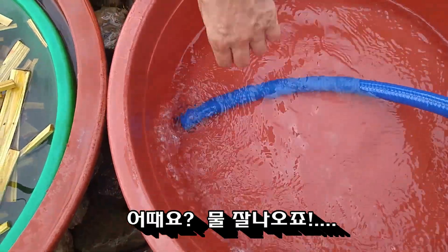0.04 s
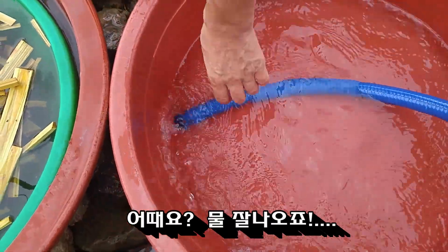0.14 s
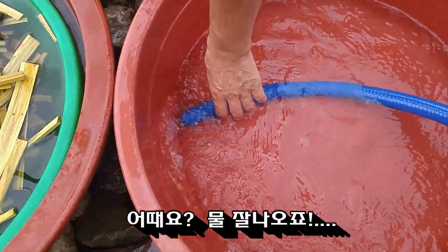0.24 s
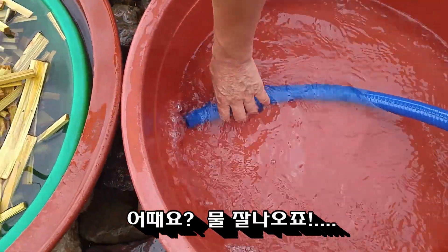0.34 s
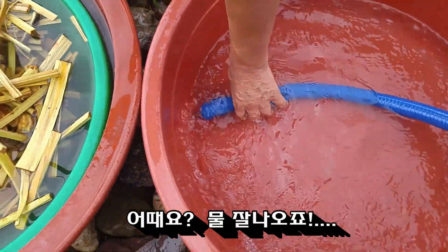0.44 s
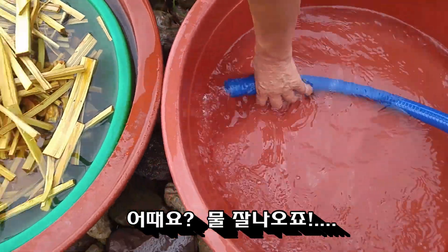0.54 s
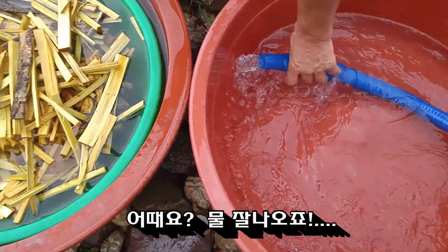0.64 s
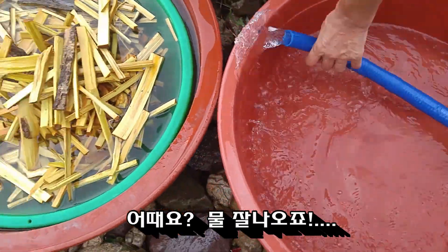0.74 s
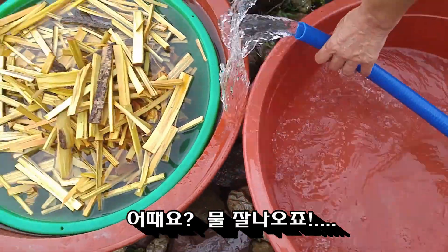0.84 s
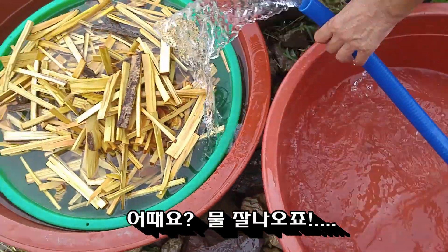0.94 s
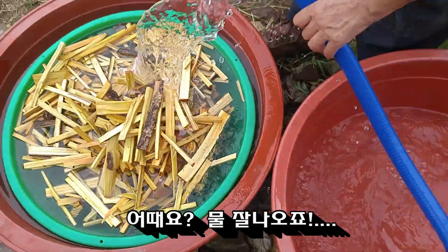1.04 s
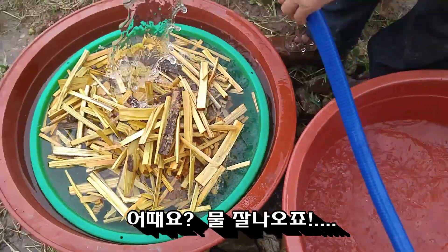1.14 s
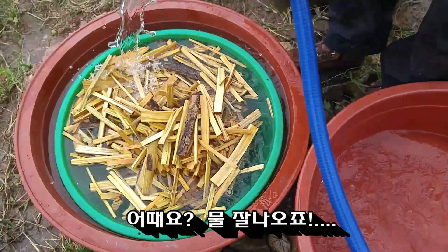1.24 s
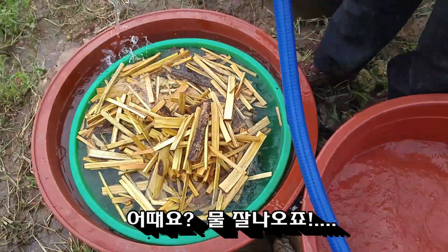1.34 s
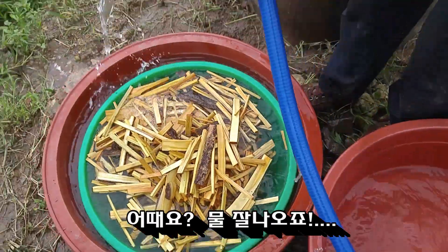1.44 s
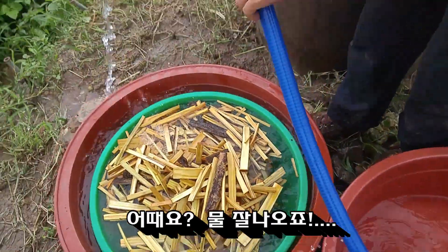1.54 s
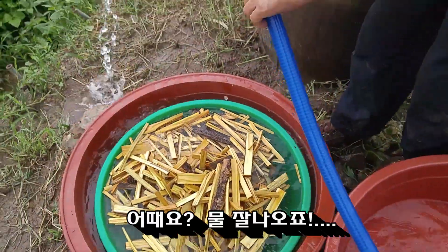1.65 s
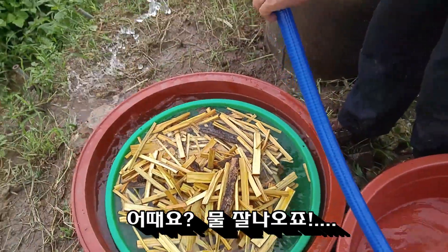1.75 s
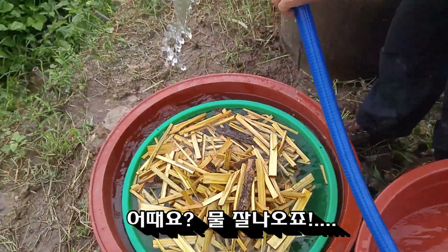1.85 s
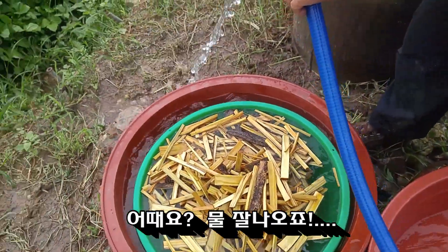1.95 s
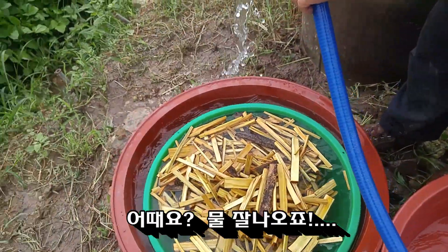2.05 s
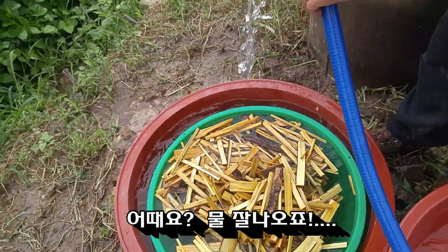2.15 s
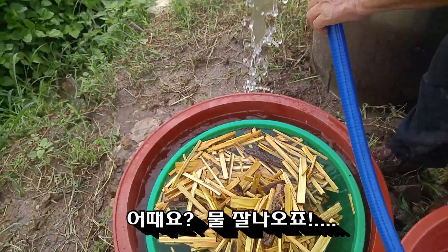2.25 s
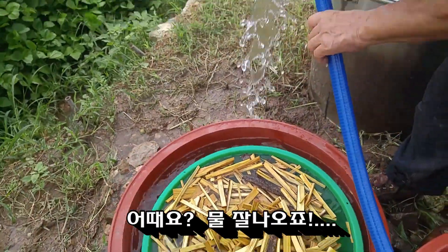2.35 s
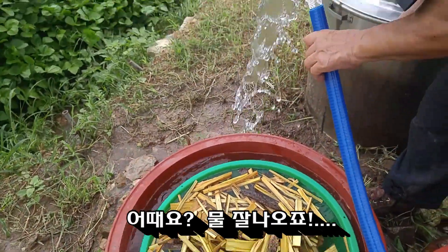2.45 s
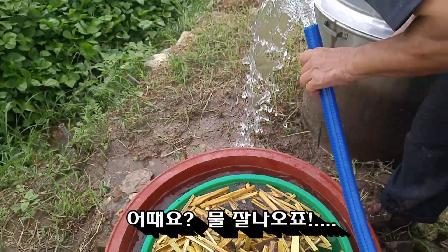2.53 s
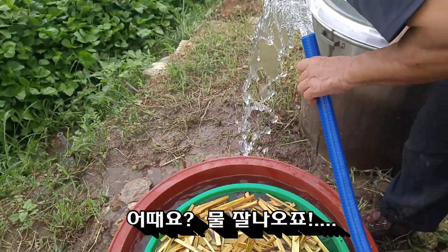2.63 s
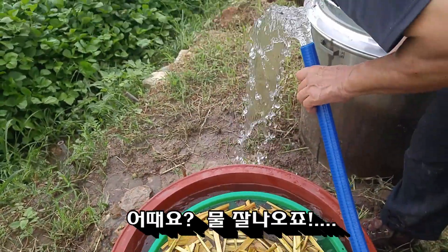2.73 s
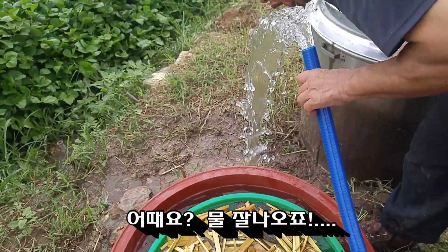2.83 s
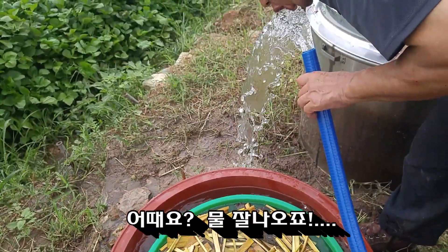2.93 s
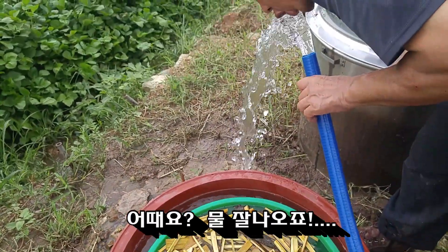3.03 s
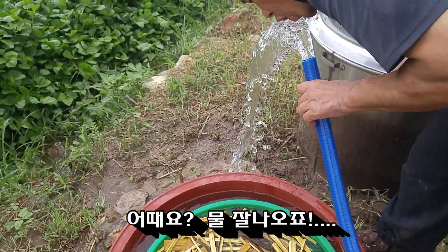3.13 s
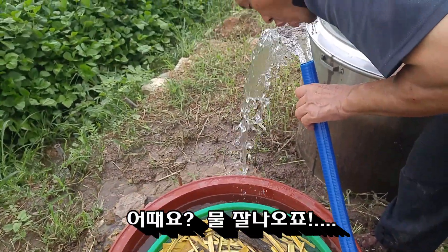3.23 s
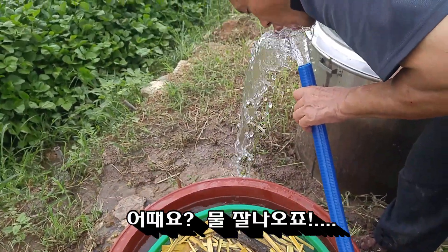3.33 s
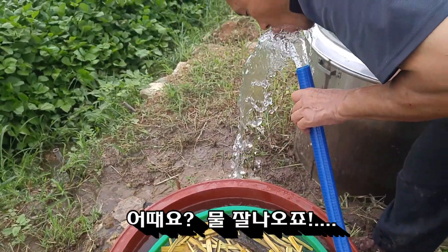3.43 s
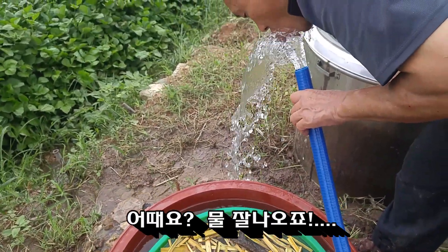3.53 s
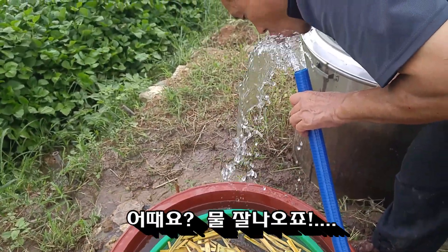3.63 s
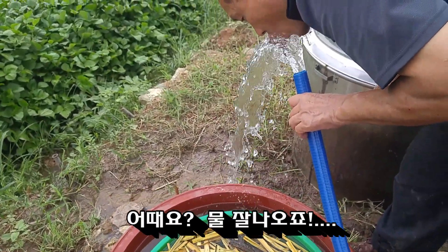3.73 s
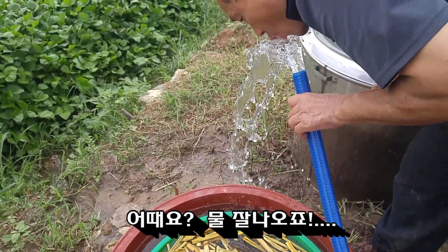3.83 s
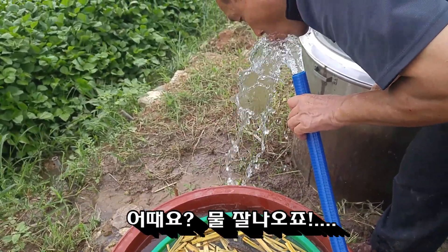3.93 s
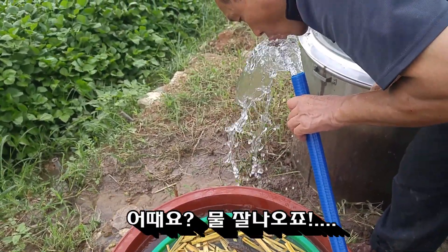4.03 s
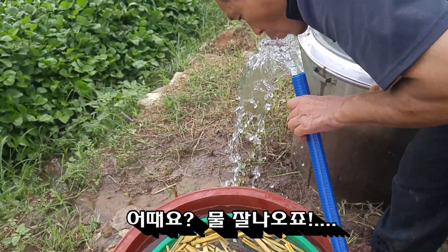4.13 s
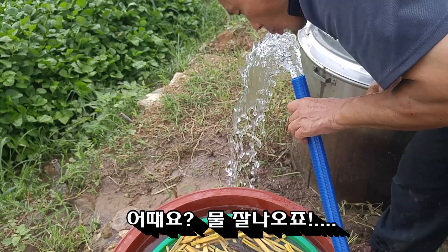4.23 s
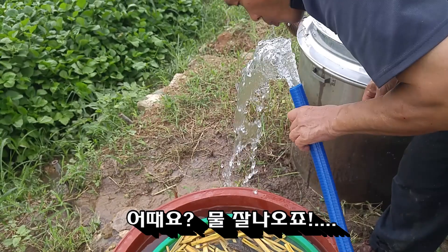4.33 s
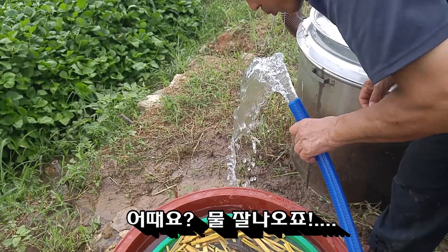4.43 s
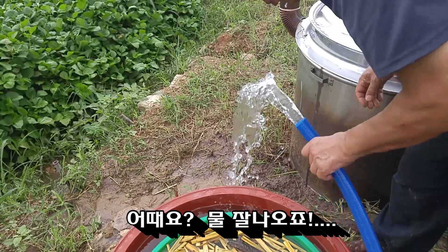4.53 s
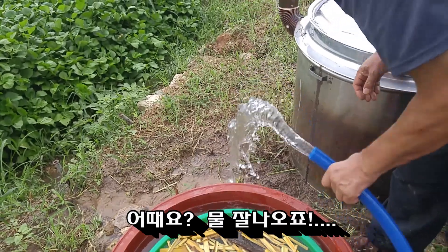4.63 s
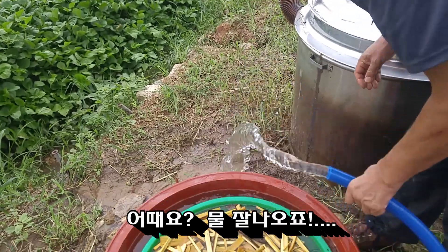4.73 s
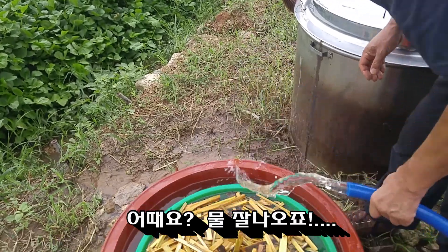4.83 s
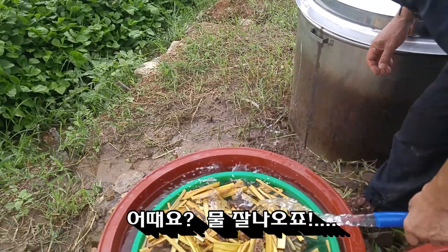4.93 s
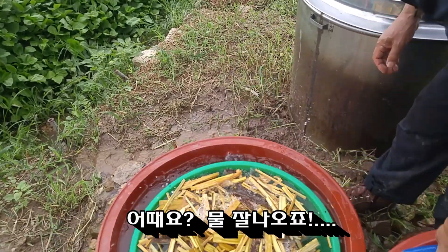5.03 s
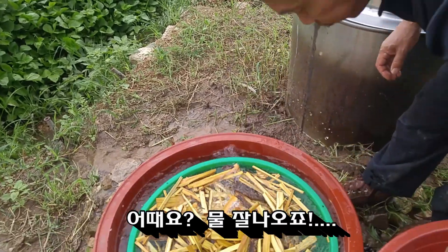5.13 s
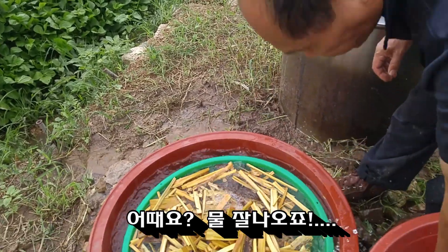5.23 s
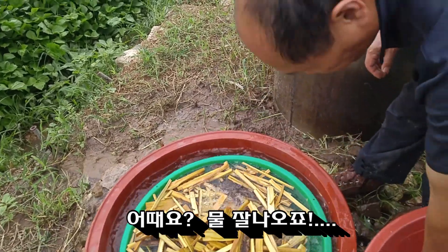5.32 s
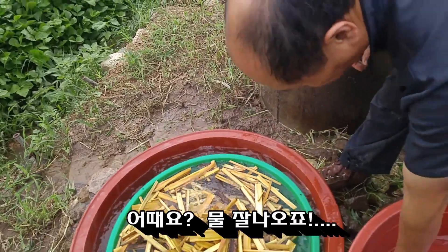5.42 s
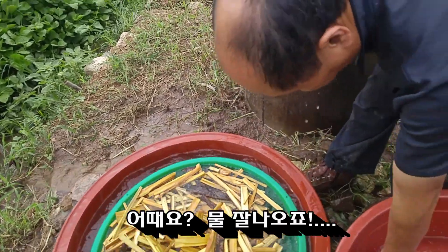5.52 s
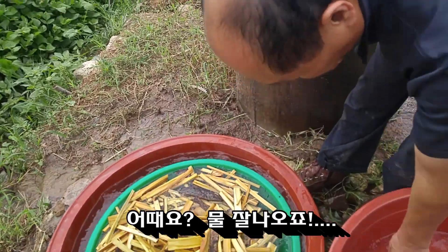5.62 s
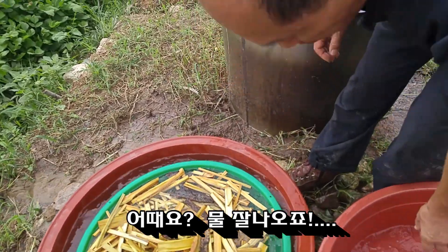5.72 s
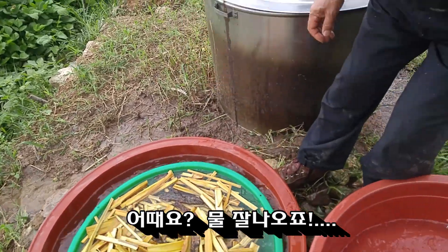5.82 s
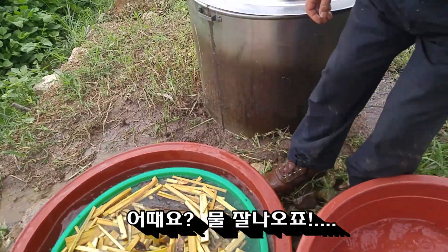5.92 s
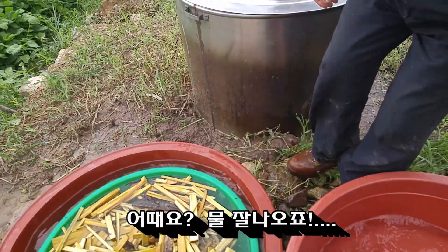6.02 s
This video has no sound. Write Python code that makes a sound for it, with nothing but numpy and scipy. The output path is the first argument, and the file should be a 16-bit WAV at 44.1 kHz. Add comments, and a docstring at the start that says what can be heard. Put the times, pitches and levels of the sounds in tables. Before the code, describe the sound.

Water from a hose gurgles and bubbles in a plastic basin outdoors. The stream lifts out, sweeps across a second tub and splatters onto wet ground, growing into a bright hiss full of sharp drops and small plops. Near the end it splashes back into the tubs with a few hollow plastic knocks. Light wind rumbles now and then on the close microphone, mostly on the right.

```python
"""Water hisses, spatters and gurgles as a hose stream sweeps from a plastic basin over a second tub and
wet ground, then back. Drop impacts make the spray and splats; trapped air rings as bubbles, plops and
gulps. Water and bumps ring the tub walls. Wind rumbles, mostly on the right microphone port. The
microphone adds a faint steady hiss, and its cavity a treble peak."""
import sys
import numpy as np
from scipy import signal
from scipy.io import wavfile

SR = 44100
rng = np.random.default_rng(int(sys.argv[2]) if len(sys.argv) > 2 else 0)


def digitize_waveform(pressure):
    """Quantize a signal to 16-bit integers and store it at the path in sys.argv[1].

    Rows of a 2-D input are taken as channels; values are limited to [-1, 1].
    """
    field = np.atleast_2d(pressure).T
    bounded = np.clip(field, -1, 1)
    quanta = np.round(bounded * 32767).astype(np.int16)
    wavfile.write(sys.argv[1], SR, quanta)


N = 267687

# Water in tubs and puddles. Each row: time in seconds, gurgle level in dB, wall drumming level in dB.
POOL_LEVELS = [(0.0, -36, -43), (0.16, -41.5, -49.5), (0.505, -32, -40.5), (0.66, -47.5, -50),
               (0.71, -24, -47), (0.9, -35.5, -47), (1.03, -41.5, -40.5), (1.21, -31, -35.5),
               (1.445, -33, -64), (1.6, -50, -53), (1.7, -36, -52), (1.9, -44, -50.5), (2.27, -38, -52.5),
               (2.95, -40, -53), (3.0, -32.5, -58), (3.15, -40, -52), (3.83, -39.5, -44.5),
               (3.97, -30.5, -44), (4.25, -41, -57.5), (4.7, -39, -52.5), (4.78, -37, -45), (4.9, -36, -50),
               (5.18, -25.5, -44.5), (5.3, -31.5, -38), (5.43, -37.5, -42), (5.675, -40, -26),
               (5.78, -49.5, -48), (5.95, -41, -51), (6.0, -41, -38), (6.07, -37, -46)]


def amp(db):
    """dB to gain."""
    return 10 ** (np.asarray(db) / 20)


def rms_one(x):
    """Scale to unit rms."""
    return x / np.sqrt(np.mean(x ** 2) + 1e-20)


def peak_one(x):
    """Scale to unit peak."""
    return x / np.max(np.abs(x))


def bandpass(x, low_hz, high_hz, order=2):
    """Butterworth band-pass."""
    return signal.sosfilt(signal.butter(order, [low_hz, high_hz], "band", fs=SR, output="sos"), x)


def in_time(rows):
    """Interpolate (seconds, values..) rows to one curve per value column."""
    times_s, *columns = np.transpose(rows)
    return [np.interp(np.arange(N) / SR, times_s, column) for column in columns]


def drift(corner_hz):
    """Slow random wander, rms 1."""
    r = np.exp(-2 * np.pi * corner_hz * 20 / SR)   # runs at SR / 20
    slow = signal.lfilter([1], [1, -2 * r, r * r], rng.standard_normal(N // 20 + 2002))[2000:]
    return np.interp(np.arange(N) / 20, np.arange(len(slow)), rms_one(slow))


def ring(clicks, hz, t60_s):
    """Damped mode: a unit click starts a unit sine."""
    r, w = amp(-60 / (t60_s * SR)), 2 * np.pi * hz / SR
    return signal.lfilter([0, np.sin(w)], [1, -2 * r * np.cos(w), r * r], clicks + 1e-18)


def arrivals(per_s, spread_db):
    """Random clicks of uneven size."""
    sizes = amp(spread_db * np.minimum(rng.exponential(1, N), 3.0))
    return sizes * (rng.random(N) < per_s / SR)


def add(out, start_s, sound, pan_db):
    """Mix a sound in; positive pan is left."""
    at = round(start_s * SR)
    part = sound[..., :N - at]
    out[:, at:at + part.shape[-1]] += part * amp([[pan_db / 2], [-pan_db / 2]])


def stream_pan_db(time_s):
    """Side on which the stream lands."""
    # Each row: time in seconds, left over right in dB.
    sweep = [(0, 2), (0.75, -1), (0.97, -8), (1.3, 6.5), (2.05, 5), (2.25, -0.5), (5.0, 0.5), (5.35, -5.5),
             (6.07, -3)]
    return np.interp(time_s, *np.transpose(sweep))


def splashing(spectrum, per_s, spread_db, t60_s, rise_s, steady, patchy_db, coherence, colour_db,
              tilt_db=0):
    """Noise bands flare at each impact over a steady bed, highs dying sooner; stereo, rms 1."""
    points_hz, points_db = np.transpose(spectrum)
    edges_hz = points_hz[0] * 2 ** np.arange(0, np.log2(points_hz[-1] / points_hz[0]) + .3, .4)
    rise = np.exp(-1 / (rise_s * SR))
    impacts = arrivals(per_s, spread_db)
    white = rng.standard_normal((2, 3, N))
    out = 0
    for k, (low_hz, high_hz) in enumerate(zip(edges_hz, np.minimum(edges_hz[1:], .45 * SR))):
        hz = np.sqrt(low_hz * high_hz)
        shared, left, right = bandpass(white[k % 2], low_hz, high_hz)
        noise = np.sqrt(coherence) * shared + np.sqrt(1 - coherence) * np.array([left, right])
        band_t60_s = t60_s * (points_hz[0] / hz) ** 0.21
        fall = amp(-60 / (band_t60_s * SR))
        coloured = impacts * amp(colour_db * drift(71))   # each drop has its own colour
        flare = rms_one(signal.lfilter([1], np.convolve([1, -fall], [1, -rise]), coloured))
        level_db = np.interp(np.log(hz), np.log(points_hz), points_db)
        level_db = level_db + tilt_db * max(np.log2(8500 / hz), 0)
        out = out + amp(level_db + patchy_db * drift(10.5)) * (steady + flare) * noise
    return rms_one(out)


def spray():
    """Dense small drops merge into a hiss."""
    # Each row: frequency in Hz, relative density in dB.
    spectrum = [(900, -18), (1700, -9.5), (2200, -2), (3100, -1.5), (4500, 0.5), (5800, -0.4), (7200, 2.95),
                (9000, -0.5), (10500, 0.5), (12500, -1.5), (16000, -12)]
    # Each row: time in seconds, level in dB.
    levels = [(0, -40), (0.43, -41.5), (0.55, -37), (0.64, -44.5), (0.75, -34), (1.04, -37), (1.1, -38),
              (1.135, -26), (1.19, -34), (1.3, -32.5), (1.46, -25), (1.495, -38), (1.58, -47), (1.64, -38),
              (1.7, -26), (1.79, -30), (1.91, -21), (2.02, -27), (2.09, -23.5), (2.14, -31), (2.23, -26),
              (2.28, -34), (2.37, -26), (3.0, -26), (3.15, -28.5), (4.6, -28.5), (4.97, -26.5), (5.03, -18),
              (5.12, -30.5), (5.235, -20.5), (5.255, -33), (5.31, -40), (5.325, -29), (5.53, -36.5),
              (5.58, -29), (5.63, -39.5), (5.8, -43), (6.07, -47)]
    # Each row: time in seconds, boost in dB per octave below 8500 Hz.
    body = [(0, 1.5), (0.5, 1), (0.75, 3), (0.95, -2), (1.13, -3), (1.27, 3), (1.45, -2), (1.6, 0),
            (1.9, -3.5), (2.1, 0), (3.9, -0.5), (4.9, 0.3), (5.12, 2.5), (5.26, -0.5), (5.55, -2.5),
            (6.07, -2)]
    level_db, = in_time(levels)
    tilt_db, = in_time(body)
    pan_db = -1 + 0.25 * stream_pan_db(np.arange(N) / SR)   # wide spray barely follows the stream
    drops = splashing(spectrum, per_s=450, spread_db=3.9, t60_s=0.015, rise_s=0.0021, steady=0.98,
                      patchy_db=1.25, coherence=0.14, colour_db=3.5, tilt_db=tilt_db)
    return amp(level_db + np.array([pan_db / 2, -pan_db / 2])) * drops


def bubbles(per_s):
    """Small bubbles at scattered pitches, each fading 60 dB in 20 cycles."""
    pitches_hz = np.geomspace(600, 2600, 18)
    births = arrivals(per_s, spread_db=2.6)
    pitch_index = rng.integers(0, len(pitches_hz), N)
    return rms_one(sum(ring(births * (pitch_index == k), hz, 20 / hz) for k, hz in enumerate(pitches_hz)))


def pool():
    """The stream churns standing water: gurgle and small bubbles."""
    # Each row: frequency in Hz, relative density in dB.
    spectrum = [(450, -41), (600, 9), (750, -10), (1000, -4.5), (1400, -8), (2000, -7), (3000, -24),
                (4500, -12)]
    level_db, _ = in_time(POOL_LEVELS)
    gurgle = splashing(spectrum, per_s=90, spread_db=2.7, t60_s=0.045, rise_s=0.0026, steady=0.71,
                       patchy_db=2.5, coherence=0.55, colour_db=6.5)
    return amp(level_db) * (0.62 * gurgle + 0.44 * bubbles(per_s=120))


def tub_walls(force):
    """Plastic wall modes, alternating in sign."""
    # Each row: frequency in Hz, gain in dB, T60 in seconds.
    modes = [(127, -4, 0.05), (195, -2, 0.074), (240, -0.5, 0.084), (332, -4, 0.068), (353, -10, 0.19),
             (405, -3, 0.088), (445.2, -3, 0.14), (649, 2, 0.036), (700, -7.5, 0.079), (867, -2, 0.06),
             (1050, -11, 0.067)]
    return sum((-1) ** k * amp(db) * ring(force, hz, t60_s) for k, (hz, db, t60_s) in enumerate(modes))


def tub_drumming():
    """Water patters on the tub walls."""
    _, level_db = in_time(POOL_LEVELS)
    patter = rng.standard_normal((2, N)) * amp(3.75 * drift(5.1))
    return amp(level_db) * rms_one(tub_walls(patter + 2.9 * patter[::-1]))


def wind(rise_s=0.021, fall_s=0.029):
    """Gusts and a light breeze rumble on the ports, more on the right."""
    # Each row: crest time in seconds, relative level in dB.
    crests = [(0.09, -41), (0.53, -48), (1.09, -42), (1.43, -43.5), (2.06, -50), (3.74, -45), (4.94, -38),
              (5.29, -49)]
    # Each row: time in seconds, relative level in dB.
    breeze_levels = [(0, -54), (1.6, -58), (2.4, -66), (3.1, -60.5), (3.5, -55), (4.4, -61.5), (5.2, -60),
                     (5.5, -55), (6.07, -55)]
    t = np.arange(N) / SR
    rumble = bandpass(rng.standard_normal((2, N)), 45, 90, order=3)
    rumble = rms_one(rumble + 0.37 * rumble[1])
    gusts = sum(amp(db) * np.exp(np.minimum((t - s) / rise_s, (s - t) / fall_s)) for s, db in crests)
    breeze = amp(in_time(breeze_levels)[0] + 3.4 * drift(2.2))
    flutter = amp(2.0 * drift(14))
    return (gusts + breeze) * flutter * rumble * amp([[-1.5], [4]])


def mic_hiss():
    """Faint steady treble hiss of the microphone."""
    return amp(-61) * np.diff(rng.standard_normal((2, N + 1)))


def plops(rise_s=0.00089, t60_s=0.03):
    """A noisy slap around the pitch of an air pocket, which rings briefly and glides up."""
    # Each row: start in seconds, peak in dB, starting pitch in Hz, slap gain from 0 to 1.
    pockets = [(0.082, -19.5, 2210, 0.84), (0.175, -25, 1480, 0.72), (0.379, -22.5, 855, 1),
               (0.7, -15, 2180, 0.4), (0.714, -11, 1110, 0.3), (0.806, -18, 1430, 0.43),
               (0.889, -17.5, 1050, 0.16), (0.964, -19, 680, 0.38), (1.071, -22.5, 2000, 0.45),
               (1.436, -16, 735, 0.49), (1.467, -14, 630, 0.58), (1.716, -22, 2050, 0.4),
               (1.844, -22.5, 1026, 0.76), (1.881, -17, 2660, 0.77), (1.954, -23, 2270, 0.5),
               (1.975, -12, 1240, 0.7), (2.018, -19, 2570, 0.44), (2.072, -19, 1970, 0.4),
               (2.382, -22.5, 1800, 0.6), (2.491, -18.5, 1220, 0.96), (2.558, -17, 1986, 0.5),
               (2.681, -16.5, 1215, 0.54), (2.707, -17, 1770, 0.55), (2.739, -16.5, 1750, 1),
               (2.78, -18.5, 2040, 0.8), (2.804, -22, 716, 0.75), (2.98, -20, 1780, 0.45),
               (2.997, -9.5, 1690, 0.79), (3.117, -22, 2240, 0.1), (3.469, -19.5, 2190, 0.61),
               (3.705, -7, 970, 0.12), (3.751, -20, 940, 1), (4.169, -16.5, 1270, 0.9),
               (4.217, -18, 790, 0.47), (4.319, -23.5, 1734, 0.63), (4.759, -14, 654, 0.9),
               (5.004, -15.5, 1360, 0.65), (5.151, -14, 1505, 0.8), (5.18, -10.5, 1416, 0.66),
               (5.224, -13.5, 700, 1), (5.471, -21, 740, 0.44), (5.554, -17, 750, 0.35),
               (5.642, -14, 707, 0.4), (5.891, -14.5, 980, 0.4), (5.969, -19.5, 830, 0.16),
               (5.983, -13.5, 843, 0.15), (5.994, -9.5, 833, 0.08), (6.018, -18, 824, 0.3)]
    out, t = np.zeros((2, N)), np.arange(6000) / SR
    envelope = (1 - np.exp(-t / rise_s)) * amp(-60 * t / t60_s)
    for start_s, db, hz, slap_gain in pockets:
        phase = 2 * np.pi * hz * (t + 2.05 * t ** 2)
        tone = np.sin(phase) + 0.23 * np.sin(1.6 * phase)
        slap = rms_one(bandpass(rng.standard_normal(len(t)), hz / 1.97, hz * 1.47, order=1))
        plop = peak_one(envelope * (tone + slap_gain * slap))
        add(out, start_s, amp(db) * plop, 0.4 * stream_pan_db(start_s))
    return out


def splats(t60_s=0.023, scatter_db=3):
    """Big drops burst: a snap, bright noise over a duller body, a thin tail."""
    # Each row: start in seconds, level in dB, bright band frequency in Hz, body relative to it in dB.
    drops = [(0.173, -25.5, 8200, -9), (0.2712, -13.5, 8600, -30), (0.5462, -16, 9000, -27),
             (0.5591, -14.5, 8700, -12), (0.6825, -18, 7000, -0.5), (0.7158, -16, 8300, 1),
             (0.7262, -14, 7300, -2), (0.753, -9.5, 8200, -4.5), (0.8143, -8.5, 8200, -17),
             (0.9058, -16.5, 9100, -24), (0.9283, -18.5, 9000, -29), (1.003, -17, 8600, -27),
             (1.07, -14.5, 7100, -13), (1.3174, -14, 7300, -28), (1.3798, -10, 8100, -34),
             (1.421, -9, 8500, -23), (1.4661, 1, 5670, -21), (1.687, -15.5, 7900, -23),
             (1.722, -11.5, 8400, -33), (1.7745, -7.5, 8400, -40), (1.805, -6.5, 7900, -39),
             (1.8781, -5.5, 6500, -6), (1.9036, -11, 8700, -36), (1.931, -8, 8600, -24),
             (1.977, -5, 7700, -11), (2.015, -5.5, 8700, -7), (2.1673, -6.5, 8600, -9),
             (2.2218, 1.5, 8940, -40), (2.3255, -11, 8700, -11), (2.353, -13, 8500, -15),
             (2.476, -10, 9000, -9), (2.5611, -11, 8300, -17), (2.758, -7, 6700, -40),
             (2.8345, -18, 8300, -7), (2.8534, -10, 8900, -2.5), (2.8968, -11.5, 8300, -13),
             (2.9823, -11, 8500, -15), (3.018, -7.5, 9100, -4), (3.0491, -9.5, 8400, -6),
             (3.1144, -8, 9100, -26), (3.3527, -12, 9400, -16), (3.3769, -9, 9000, -19),
             (3.403, -13, 8300, -12), (3.4695, -17, 8800, -15), (3.544, -13, 8800, -35),
             (3.6274, -10, 8850, -30), (3.9658, -15, 8550, -14), (4.026, -13.5, 8300, -13),
             (4.2532, -11.5, 8200, -10), (4.377, -11.5, 8600, -23), (4.7314, -10, 8750, -28),
             (4.83, -12.5, 8700, -14), (4.9975, -15, 8900, -6), (5.037, -11, 8500, -22),
             (5.076, -11, 8500, -13), (5.15, -14, 8200, 0), (5.209, -9, 8800, -27), (5.224, -12, 8500, -13),
             (5.322, -12, 6470, -25), (5.4049, -10.5, 8400, -29), (5.444, -12.5, 9100, -30),
             (5.738, -13.5, 7100, -23), (5.887, -18, 8500, -5)]
    out, t = np.zeros((2, N)), np.arange(4000) / SR
    decay_db = -60 * t / t60_s
    snap = 1.6 * np.exp(-t / 0.00033)
    tail = 0.16 * amp(decay_db / 2.8)
    envelope = (1 - np.exp(-t / 0.0001)) * (amp(decay_db) + tail + snap)
    for start_s, db, hz, body_db in drops:
        noise = rng.standard_normal((3, len(t)))
        burst = (1.03 * noise[0] + noise[1:]) * envelope   # partly shared by the two ports
        bright = peak_one(bandpass(burst, hz / 1.77, hz * 1.38) + 0.16 * burst)
        body = amp(body_db) * peak_one(bandpass(burst, 1500, 4000))
        pan_db = stream_pan_db(start_s) + scatter_db * rng.standard_normal()
        add(out, start_s, amp(db) * (bright + body), pan_db)
    return out


def tub_bumps():
    """A knock and a short rub ring the tub walls."""
    # Each row: start in seconds, peak in dB, most excited region in Hz, contact decay in seconds.
    bumps = [(0.452, -32, 378, 0.016), (0.728, -36, 519, 0.01), (1.181, -32, 447, 0.012),
             (1.402, -22.5, 212, 0.008), (1.439, -26, 132, 0.012), (3.385, -27.5, 413, 0.016),
             (3.462, -23.5, 400, 0.0058), (3.532, -29.5, 406, 0.0052), (3.723, -25.5, 401, 0.01),
             (3.75, -21.5, 410, 0.0069), (3.837, -36, 256, 0.017), (3.978, -29.5, 412, 0.0064),
             (4.217, -32.5, 240, 0.0062), (4.76, -14, 410, 0.016), (5.332, -24.5, 460, 0.0093),
             (5.479, -10.5, 195, 0.0034), (5.551, -13.5, 423, 0.0059), (5.574, -21, 440, 0.022),
             (5.643, -10.5, 366, 0.016), (5.664, -21, 386, 0.024), (5.988, -35, 245, 0.018)]
    out, t = np.zeros((2, N)), np.arange(8000) / SR
    for start_s, db, hz, contact_s in bumps:
        contact = rng.standard_normal(len(t)) * np.exp(-t / contact_s)
        contact[0] += 2.8 * np.sqrt(contact_s * SR)   # the knock
        force = bandpass(contact, hz / 1.58, hz * 1.74)   # the spot hit picks the modes
        add(out, start_s, amp(db) * peak_one(tub_walls(force)), pan_db=0)
    return out


def gulps():
    """Large bubbles rise in pitch as they near the surface."""
    # Each row: start in seconds, level in dB, start pitch in Hz, end pitch in Hz, length in seconds.
    glides = [(0.733, -18.5, 587, 706, 0.011), (.755, -22.5, 687, 716, 0.039),
              (0.832, -25.5, 1130, 1410, 0.035), (0.863, -28, 873, 997, 0.054),
              (1.848, -34.5, 950, 1420, 0.036), (5.886, -22, 963, 997, 0.03)]
    out = np.zeros((2, N))
    for start_s, db, start_hz, end_hz, length_s in glides:
        progress = np.arange(0, 1, 1 / (length_s * SR))
        phase = 2 * np.pi * np.cumsum(start_hz + (end_hz - start_hz) * progress) / SR
        envelope = np.sqrt(np.sin(np.pi * progress ** 0.67)) * np.exp(-1.1 * progress)
        add(out, start_s, amp(db) * envelope * np.sin(phase), pan_db=0)
    return out


def lag_left(x, lag_s=0.00013):
    """The stream is nearer the right port, so the left hears it later."""
    samples = np.arange(N)
    return np.array([np.interp(samples - lag_s * SR, samples, x[0]), x[1]])


def scene():
    """All sources at the two ports."""
    stream = spray() + pool()
    hiss = mic_hiss()
    water = lag_left(stream + splats() + plops() + gulps())
    return water + tub_drumming() + tub_bumps() + wind() + hiss


def record(dry, left_bass_cut_hz=253, top_cut_hz=15820):
    """Microphone: cavity peak and dips, thinner left port, clipping, steep top cut."""
    # Each row: centre in Hz, width in Hz, gain in dB.
    cavity = [(8700, 1000, 11.5), (7760, 270, -8.5), (515, 162, -8.5)]
    for hz, width_hz, db in cavity:
        r = np.exp(-np.pi * width_hz / SR)
        numerator = np.array([1, 0, -1]) * (1 - r * r) / 2
        denominator = [1, -2 * r * np.cos(2 * np.pi * hz / SR), r * r]
        dry = dry + (amp(db) - 1) * signal.lfilter(numerator, denominator, dry)
    left = signal.lfilter(*signal.butter(1, left_bass_cut_hz, "high", fs=SR), dry[0])
    clipped = np.clip([left, dry[1]], -.85, .85)
    return signal.sosfilt(signal.ellip(14, .5, 80, top_cut_hz, fs=SR, output="sos"), clipped)


dry = scene()
out = record(dry)
digitize_waveform(out)
```